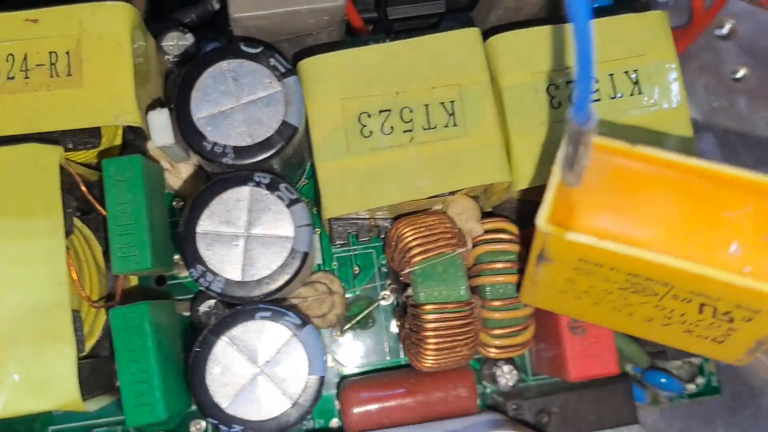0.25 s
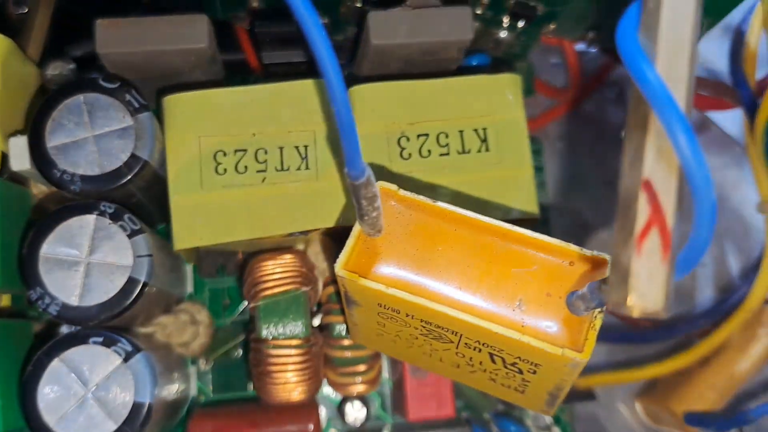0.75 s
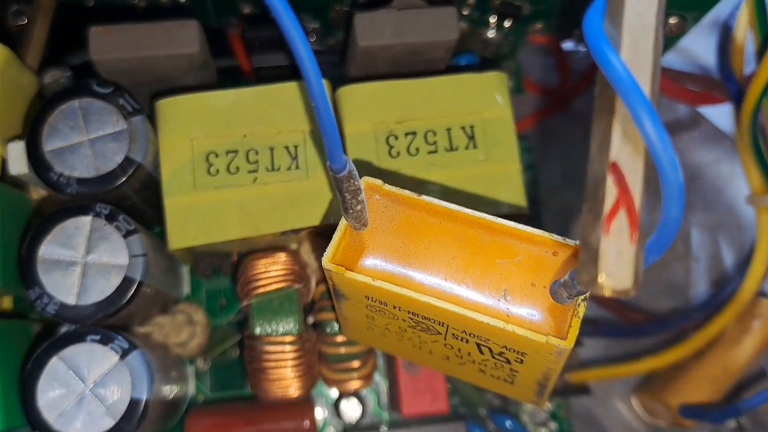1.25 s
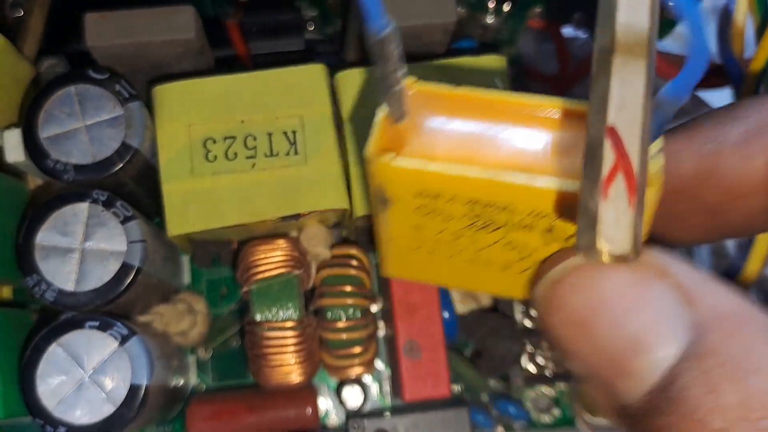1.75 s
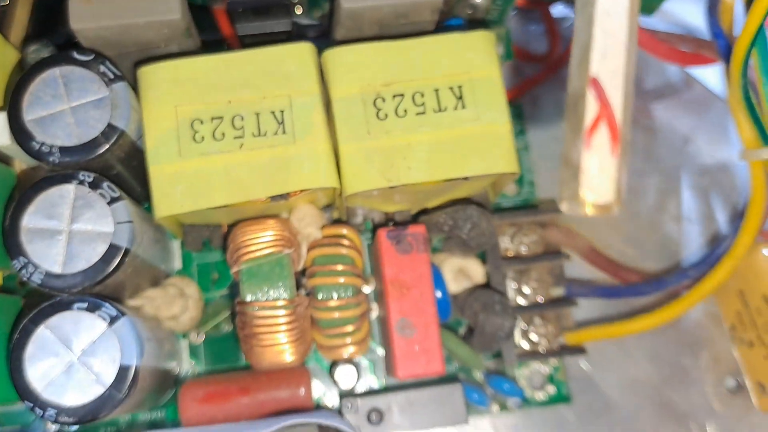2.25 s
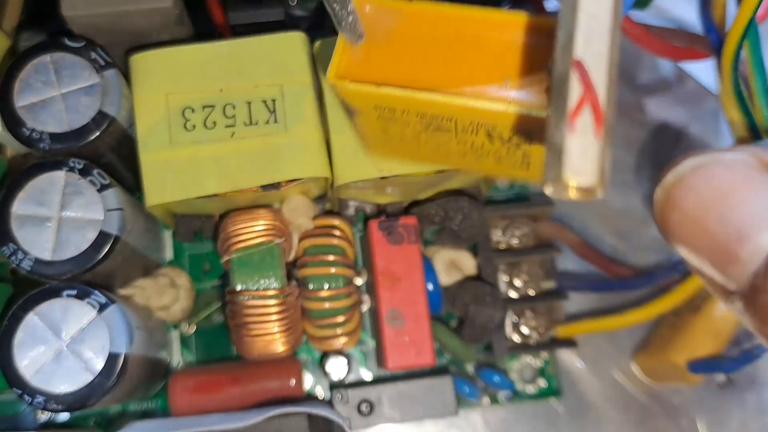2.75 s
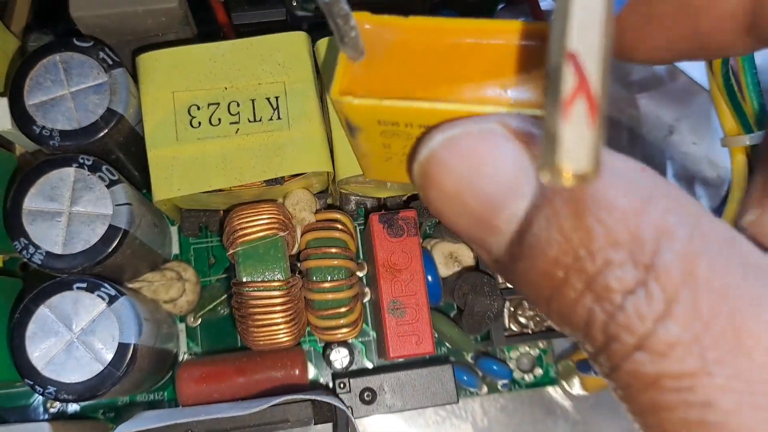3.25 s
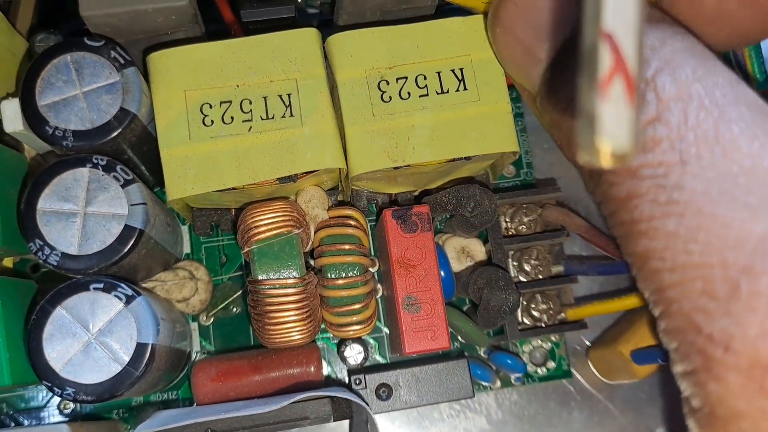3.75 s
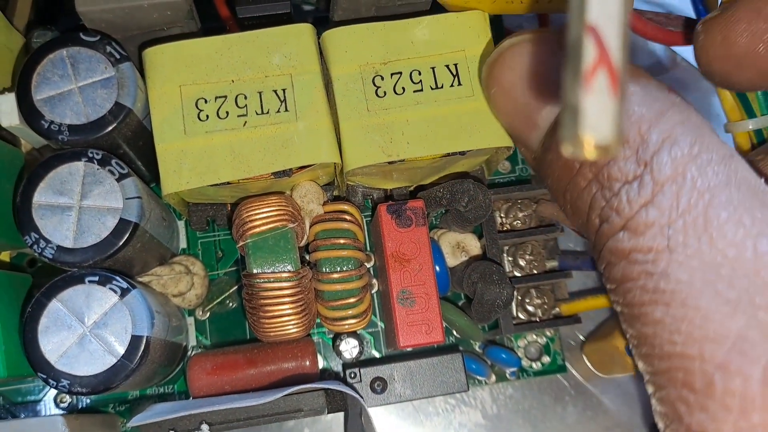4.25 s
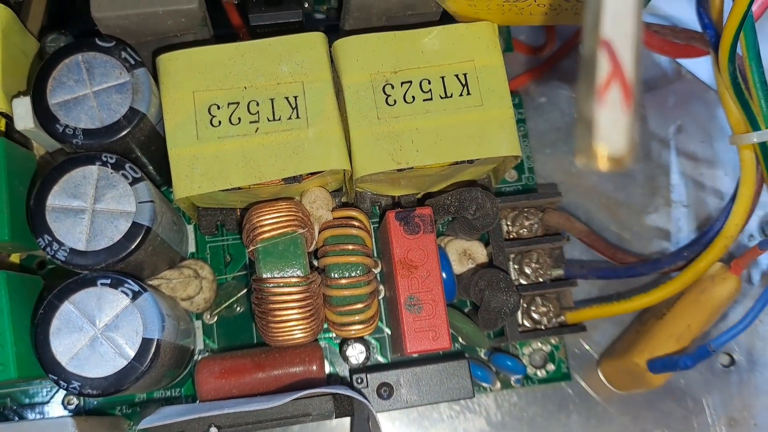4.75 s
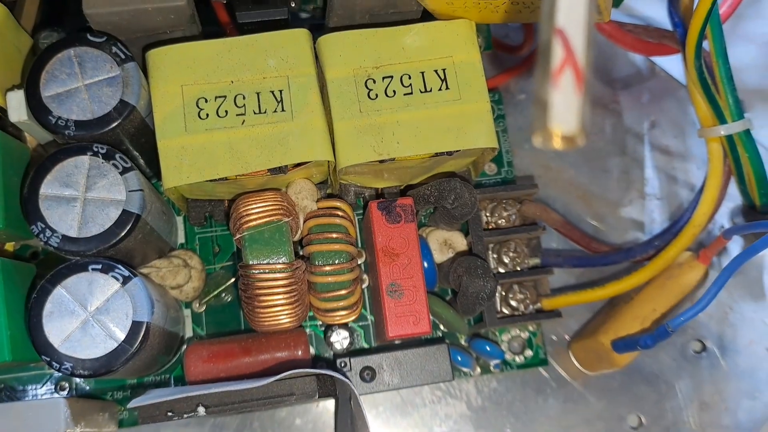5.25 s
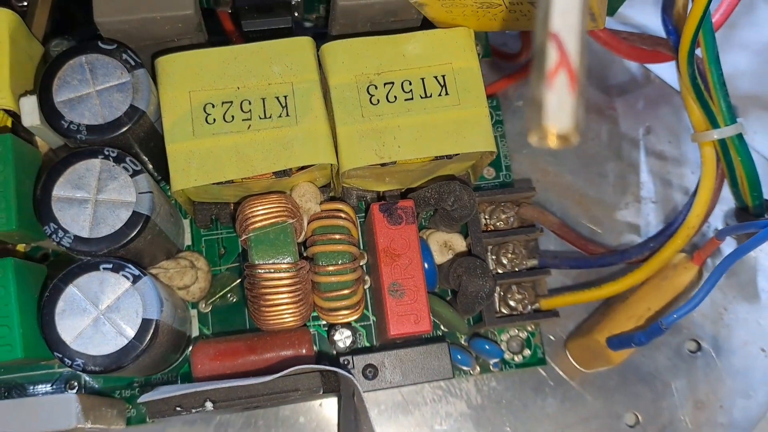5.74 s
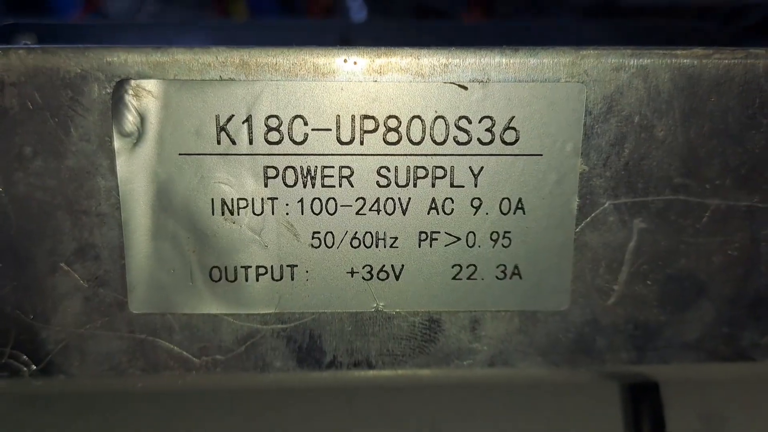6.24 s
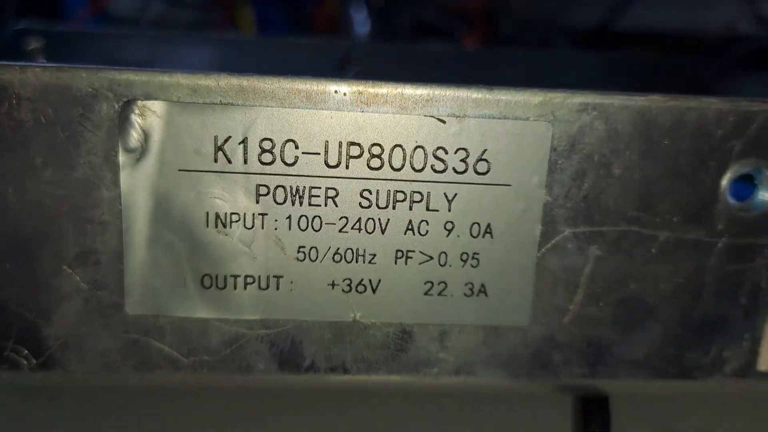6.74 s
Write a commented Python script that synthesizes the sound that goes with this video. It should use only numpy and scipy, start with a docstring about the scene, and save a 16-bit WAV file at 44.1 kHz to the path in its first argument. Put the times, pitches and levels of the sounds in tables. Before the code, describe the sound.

Hard plastic part knocks, scrapes and squeaks briefly against a thin metal case in a quiet room, with finger ticks close to the microphone.

```python
"""A hand lifts, drags and taps a small plastic part against the open metal case of a power supply.
Taps ring the metal's modes, with noise for rattle and crack; filtered noise scrapes and slides, tones squeak.
Fingers tick and rub on the body of a hand-held camera close by: noise bursts, low pushes and short strokes.
Behind them the bench rumbles, bumps and hums, and the quiet room and microphone hiss: noise and a low tone."""
import sys
import numpy as np
from scipy import signal
from scipy.fft import rfft, irfft, next_fast_len
from scipy.io import wavfile
from scipy.ndimage import uniform_filter1d, map_coordinates

SR = 44100
rng = np.random.default_rng(int(sys.argv[2]) if len(sys.argv) > 2 else 0)


def amplitude_ratio(level_db):
    """Convert a level in decibels to the matching linear amplitude (field) ratio."""
    exponent = np.asarray(level_db, float) / 20
    return 10 ** exponent


def bounce(signal):
    """Save signal as a 16-bit WAV file at the path given by the first command-line argument."""
    frames = np.transpose(np.atleast_2d(signal))
    limited = np.clip(frames, -1, 1)
    pcm = np.round(limited * 32767).astype(np.int16)
    wavfile.write(sys.argv[1], SR, pcm)


N = 308391  # length in samples

# taps on the case; the crack is relative to the ring's peak:
# start_s, ring_peak_db, low_mode_hz, high_mode_hz, crack_db
TAPS = [(1.11, -34.5, 785, 4080, -4.5), (1.136, -32.5, 748, 2200, -8.5), (1.227, -21, 686, 2120, -17),
        (1.321, -53, 1540, 2450, -3.5), (1.34, -56.5, 603, 2470, 7), (1.42, -30, 1620, 1880, -20.5),
        (1.578, -30, 1030, 1910, -34), (1.722, -35.5, 1320, 1930, -42), (1.745, -33, 1350, 2780, -45),
        (1.758, -32.5, 1065, 1840, -42), (1.915, -52.5, 1010, 4010, -20.5), (1.938, -32, 1920, 4240, -20),
        (2.026, -27.5, 1060, 3000, -35), (2.036, -12, 1870, 4040, -49), (2.164, -41.5, 996, 1940, -26),
        (2.242, -47, 1060, 1910, -28), (2.388, -37.5, 785, 1210, -23), (2.393, -36.5, 1000, 4500, -1),
        (2.409, -42, 785, 1945, -28), (2.429, -41.5, 1000, 5630, -2.5), (2.447, -36, 786, 1195, -27),
        (2.476, -31.5, 783, 1220, -25), (2.528, -83.5, 1200, 4890, 2.5), (2.776, -31.5, 2100, 3970, -14),
        (3.054, -54, 789, 5560, -10), (3.147, -38, 781, 2110, -43), (3.158, -27, 1200, 1934, -67),
        (3.295, -25.5, 1310, 2482, -25.5), (3.326, -38, 1430, 2460, -28), (3.35, -26.5, 993, 1940, -28),
        (3.398, -31, 1200, 1934, -55), (3.41, -38.5, 1330, 1970, -31), (3.461, -42, 1200, 1485, -30.5),
        (3.512, -36, 875, 2130, -9), (3.526, -22.5, 1430, 1536, -19.5), (3.54, -24, 900, 2950, -7.5),
        (3.553, -27, 1420, 1520, -10), (3.575, -24.5, 1320, 3010, -21.5), (3.603, -27.5, 3040, 5580, -3.5),
        (3.647, -12.5, 1530, 1940, -11), (3.655, -24, 1065, 1940, -40), (3.755, -33.5, 1060, 1200, -29),
        (3.847, -21.5, 781, 1210, -66), (3.856, -34.5, 781, 2060, -49), (3.875, -41, 781, 1330, -46),
        (4.063, -25.5, 1060, 1910, -19), (4.157, -42.5, 1000, 1200, -20), (4.222, -24, 1440, 1520, -25),
        (4.232, -37.5, 1065, 1450, -43), (4.344, -17, 885, 2060, -47.5), (4.358, -24, 640, 2190, -40),
        (4.367, -28.5, 885, 2210, -45.5), (4.521, -51.5, 665, 3840, -4.5), (4.562, -44.5, 834, 3870, 3),
        (4.638, -45, 993, 1900, -25.5), (5.106, -52.5, 1150, 1870, -26.5)]
# ways the metal case rings; t60 is the time to fade 60 dB: pitch_hz, level_db, t60_s, left_lead_rad
CASE_MODES = [(545, -8, .1, -.4), (640, -2, .13, -.7), (785, -4, .12, -.5), (885, -5, .14, .3),
              (995, -4, .12, 1.1), (1065, -2, .11, 1.3), (1195, -3, .11, 1.6), (1330, -6, .1, 2.1),
              (1450, -1, .09, 2.2), (1520, -3, .07, 2.3), (1700, -9, .07, 2.2), (1870, -2, .1, 1.9),
              (1945, -1, .11, 1.7), (2060, -5, .1, 1.4), (2210, -4, .09, 1.1), (2330, -3, .06, .8),
              (2460, -5, .07, .7), (2820, -8, .07, 1.4), (3020, -6, .07, 1.9), (3110, -4, .06, 2.1),
              (3290, -6, .045, 2.5), (3970, -4, .075, .3), (4240, -6, .06, .2), (4760, -10, .045, 1.5),
              (5290, -10, .04, 2.5), (5580, -6, .045, -.4), (6040, -7, .04, .6), (6770, -10, .025, 1.4),
              (7500, -14, .03, 1.3)]
# low modes sound from the right, higher ones from the left: low_mode_hz, left_over_right_db
PANELS = [(650, -6), (850, -5.5), (1000, 6), (1450, 7), (1900, 3.5)]
HIGH_MODE_DB = -2  # the high mode's share of a blow
BLOW_DB, BLOW_S = -4, .003  # extra ring while part and metal touch, and how fast it dies away
HAND_DAMPING = .85  # share of the ring time left while something drags on the metal

# edges squeaking as they stick and slip: start_s, end_s, level_db, start_pitch_hz, end_pitch_hz
SQUEAKS = [(0.958, 1.096, -61, 5720, 4840), (1.004, 1.106, -59, 2430, 2203),
           (1.041, 1.151, -51, 4190, 4080), (2.09, 2.111, -39.5, 963, 990), (2.169, 2.187, -37, 992, 1100),
           (2.183, 2.2, -44, 1060, 1110), (2.204, 2.241, -57, 1050, 1080), (2.277, 2.3, -51, 940, 996),
           (2.291, 2.317, -41.5, 989, 1048), (2.314, 2.33, -46, 1060, 1070),
           (2.333, 2.366, -62, 1060, 1055), (3.213, 3.245, -58, 4000, 3700),
           (3.249, 3.286, -46.5, 3106, 3110), (3.621, 3.648, -35, 3250, 3270),
           (3.622, 3.648, -39.5, 1500, 1453)]
# the part dragged along the case: start_s, end_s, level_db, start_centre_hz, end_centre_hz
DRAGS = [(0.967, 1.09, -54, 5150, 3580), (1.0, 1.096, -52.5, 895, 875), (1.109, 1.134, -44, 2320, 2330),
         (2.143, 2.178, -48, 4000, 4000), (2.383, 2.43, -54, 3040, 3080), (2.464, 2.497, -51, 4220, 4550),
         (2.507, 2.542, -51.5, 5330, 5500), (2.734, 2.755, -42.5, 5300, 5300),
         (3.205, 3.284, -52.5, 2780, 2930), (3.609, 3.656, -32.5, 3440, 2550),
         (4.047, 4.06, -42, 3040, 2980), (4.115, 4.222, -60, 2500, 4200), (5.004, 5.118, -71, 3520, 2590)]
# air in a drag before its firmness counts: start_centre_hz, air_db
DRAG_AIR = [(900, -29), (2500, -13.5), (5400, -7.5)]
FIRM_DB, AIR_LOSS = -52.5, 0.52  # air loses this share of each dB above firm, and gains it below
DRAG_PAN_DB = 2.5  # left over right

# loose contact of hand, part and wires with the case: time_s, level_db, brightness_db
CONTACT = [(0.0, -73.5, -8), (0.35, -69.5, -13), (0.75, -75.5, -13), (0.93, -87, -4), (1.02, -65, 15),
           (1.14, -50.5, 6), (1.3, -55, -1.5), (1.4, -68, -2), (1.45, -59.5, 3.5), (1.65, -59.5, 4),
           (1.72, -64, -2), (1.87, -76, -22), (1.96, -56.5, 2.5), (2.1, -57, 3.5), (2.35, -61.5, 0),
           (2.5, -73, -11), (2.58, -73.5, -6), (2.8, -64, 12), (3.12, -75, -8.5), (3.2, -56, 3),
           (3.45, -58.5, 1.5), (3.68, -48.5, 0), (3.82, -62.5, -2), (3.92, -50.5, -11.5),
           (4.03, -61.5, -11), (4.45, -50, -12), (4.63, -68, 6.5), (4.8, -85, -3), (5.39, -80.5, 3.5),
           (5.43, -53, -1), (5.55, -58, -4.5), (5.64, -70.5, -25), (5.8, -86.5, -5), (6.2, -91, -9),
           (6.27, -69, -10), (6.42, -94, -5), (6.99, -79.5, 2)]
LOW_DB, HIGH_DB, SKIN_DB, AIR_DB = -4, -11.5, -13, -24  # each layer relative to the contact level
FLUTTER_DB, FLUTTER_RATE = 4, 9.9  # unsteady pressure: typical swing, knots per second
# the part slithers on after a tap: level relative to it, time to fade 20 dB, share of hiss
SETTLE_DB, SETTLE_S, SETTLE_SKIN_DB = -30.5, 0.037, -9.5
SLIP_DB, SLIP_RATE = 6.5, 50  # gritty slips: typical swing, knots per second

# skin and wire sleeves sliding; air is relative to skin; rows with fade 0 or less are silent:
# peak_s, fade_20db_s, level_db, air_db, left_over_right_db
SLIDES = [(0.168, 0.0058, -55.5, -29, -45), (.33, .3, -78, -8, 0), (0.758, 0.1, -68, -2, -52),
          (1.05, 0, -50, -3, -5), (1.088, 0.1048, -72, 11, -15), (1.15, .07, -91, -9, -5),
          (1.26, 0.36, -77, 2, -13), (1.94, 0.07, -57, -17.5, 14), (2.4, 0.08, -63.5, -9.5, 3),
          (2.7, -0.46, -68, 0, -0.5), (2.78, 0.0628, -53, 2, -18), (2.829, 0.57, -63.5, -7.5, 1.5),
          (3.251, 0.13, -65.5, -11.5, 1), (3.68, -0.03, -69, -2, 8.5), (4.052, 0.16, -66.5, -5, 20),
          (4.209, 0, -60.5, -5.5, 21.5), (4.61, 0.14, -68.5, -5, -0.5), (4.839, 0.4, -84.5, 9, -57.5),
          (5.04, 0.12, -66.5, -12.5, 5), (5.47, 0.39, -70.5, -24, 3), (5.74, 0.03, -77, 0, -7.5),
          (6.249, 0.12, -70, -1, 2), (6.63, 0.4, -78.5, -4.5, -56), (6.87, 0.27, -75, -8.5, 22)]
# finger strokes over the camera; body and bass are relative to the rub:
# start_s, end_s, level_db, body_db, bass_db
STROKES = [(0.143, 0.211, -70.5, 7, 11), (0.723, 0.796, -66, 3.5, 12), (4.805, 4.859, -54, -25, -28),
           (4.838, 4.914, -43.5, -14.5, -17.5), (5.697, 5.804, -63.5, 17.5, 35), (6.55, 6.599, -68, 5, 0),
           (6.592, 6.672, -54.5, -4, -0.5)]
FINGER_PAN_DB, GRIP_DB = -40, 13.5  # finger by the right port; bass above the second evens the sides
# ticks on the camera; treble and thump are relative to the snap:
# start_s, peak_db, treble_db, thump_db, left_over_right_db
TICKS = [(2.775, -23.5, 9.5, -38, -15), (4.84, -6, -1, -24.5, -62.5), (5.649, -45.5, -3, 4.5, -34),
         (6.185, -59.5, -14, 11.5, 19), (6.232, -25.5, -6.5, 1, 13.5), (6.251, -44.5, -10, 7, -27),
         (6.462, -71.5, -11, 4.5, -4.5), (6.474, -54.5, -21.5, 0, -12), (6.49, -52.5, -11, 6.5, -22),
         (6.538, -26, -4, -6, -53)]

# shaking of bench and hand, before each layer's own offset: time_s, level_db
RUMBLE = [(0.0, -56.5), (0.39, -55), (0.56, -64), (1.44, -63), (2.53, -61), (3.13, -66), (3.74, -54),
          (4.13, -61.5), (4.5, -63), (4.96, -72.5), (5.45, -65.5), (5.65, -57.5), (5.76, -72), (6.21, -63),
          (6.37, -61), (6.99, -70.5)]
# dull bumps through the bench; rows with fade 0 or less are silent: peak_s, fade_20db_s, level_db
BUMPS = [(.22, 0.37, -46.5), (.72, -0.2, -59), (1.02, -0.31, -43.5), (1.13, 0.31, -44),
         (1.24, 0.086, -41.5), (1.42, -0.2, -36.5), (1.63, 0.34, -57), (1.75, -0.2, -40), (1.95, 0.1, -50),
         (2.04, 0.29, -45), (2.45, 0.44, -52.5), (3.17, 0.74, -56), (3.31, 0.54, -57), (3.51, 0.3, -51.5),
         (3.76, 0, -49), (3.86, 0.47, -58), (4.19, 0.17, -58), (4.36, 0.09, -42), (4.85, 0.06, -53.5),
         (5.45, 0.07, -49.5), (5.725, 0.0259, -46.5), (5.755, 0.004, -40.5), (5.779, -0.0527, -34),
         (6.23, 0.7, -71.5), (6.48, -0.13, -67.5), (6.54, -0.15, -45), (6.62, 0.1, -68.5)]
# spells in which the hum stands out: start_s, end_s, level_db
HUMS = [(.16, .28, -47.5), (0.662, .74, -55), (0.98, 1.05, -58), (1.109, 1.2, -54), (2.43, 2.52, -54.5),
        (3.098, 3.2, -61), (3.6, 3.72, -59), (3.863, 3.98, -58), (6.26, 6.43, -52), (6.5, 6.67, -58.5),
        (6.68, 6.88, -54)]
HUM_HZ = 92.1  # average pitch
HUM_UNDER_DB = -9.5  # the hum's usual level relative to the rumble

# tone colours of noise, strengths relative within each: pitch_hz, level_db
GRIT = [(400, -33), (800, -4.5), (2000, -4), (4000, -9), (6000, -11), (9000, -35.5)]  # rough contact
SKIN = [(2000, -27), (3500, -5.5), (5500, -3), (7000, -4.5), (8500, -16.5), (11000, -46)]  # sliding hiss
AIR = [(6000, -32), (8500, -3), (10500, -6.5), (12500, 1), (14000, -7.5), (15700, -8), (16000, -42)]  # highest hiss
RUB = [(240, -31), (400, -10), (789, -24.5), (921, -26), (1010, -15), (3930, -10.5), (5270, -5.5),
       (6640, -3), (9320, -8), (12100, 1.5), (16000, -16.5)]  # finger on the camera
PUSH = [(18, -35.5), (30, -0.5), (86, 6), (140, -13), (250, -6.5), (473, -10.5), (636, -20), (724, -20),
        (2280, -38.5), (2500, -32), (3250, -46.5), (5500, -120)]  # finger pressure
SNAP = [(180, -52), (300, -7.5), (981, -18), (1570, -2.5), (3170, -11.5), (3720, -3), (4260, 2.5),
        (4810, -1.5), (7500, -4.5), (9750, -45), (16500, -120)]  # dry tick
BENCH = [(20, -38.5), (35, -4), (55, 3), (80, 2.5), (120, -12), (170, -58)]  # deep shaking
THUD = [(90, -24), (150, -3), (200, -7.5), (250, -1.5), (310, -5.5), (385, -6.5), (425, -3), (480, -12.5),
        (700, -11), (1300, -29), (2500, -52)]  # dull bumps
HUSH = [(59, -33), (100, 4), (410, -22), (446, -27), (615, -25), (1170, -38), (1540, -30), (2630, -32.5),
        (2920, -31.5), (5210, -40), (6580, -38), (7170, -45.5), (12000, -35), (15100, -39.5), (16500, -51)]  # quiet room and microphone hiss
# how alike left and right are in the hush, 1 being the same: pitch_hz, likeness
ALIKE = [(60, 1), (240, -0.4), (950, 0.75), (3770, -0.47), (15000, -0.1)]
# how long the room takes to fade 60 dB: pitch_hz, t60_s
ROOM = [(200, 0.12), (1000, 0.36), (4000, 0.5), (12000, 0.35)]
# the microphone's response: pitch_hz, gain_db
MIC = [(20, -22), (35, -5.5), (48, 1), (15600, 0.15), (16000, -16.5), (16900, -31)]


def taps():
    """Each blow favours a low and a high mode, wakes their neighbours, rattles and cracks."""
    track, t = np.zeros((2, N)), np.arange(SR // 5) / SR
    hz, db, t60, lead = np.transpose(CASE_MODES)[:, :, None]
    chance = rng.standard_normal((len(TAPS), 2, len(CASE_MODES), 1))
    # what the high mode leaves to the low one
    low_share = np.sqrt(max(1 - amplitude_ratio(2 * HIGH_MODE_DB), .02))
    for (s, peak_db, low_hz, high_hz, crack_db), (size, phase) in zip(TAPS, chance):
        # a crisp, glancing contact rings for a shorter time
        ring_share = np.clip(.3 - .022 * crack_db, .3, 1)

        def blow(f):
            low = low_share * amplitude_ratio(reach(f, low_hz, 0.32))
            return low + amplitude_ratio(HIGH_MODE_DB + reach(f, high_hz, 0.69))

        # modes close to the two struck pitches stand out
        struck_db = 6 * sum(np.exp(-(np.log2(hz / spot) / .04) ** 2) for spot in (low_hz, high_hz))
        scatter_db = 2.5 * size
        fade = blow(hz) * amplitude_ratio(db + struck_db + scatter_db - 60 * t / (t60 * ring_share))
        fade = fade * (1 - np.exp(-t / 0.00029))  # quick onset
        fade = fade * (1 + amplitude_ratio(BLOW_DB) * np.exp(-t / BLOW_S))
        angle = 2 * np.pi * hz * t + .45 * phase
        left = (fade * np.sin(angle + lead / 2)).sum(0)
        right = (fade * np.sin(angle - lead / 2)).sum(0)
        ring = np.array([left, right])

        noise = rng.standard_normal((2, 2, len(t)))
        # loose contact is broader than the ring
        rattle = unit(filtered(coloured(noise[0], GRIT), lambda f: blow(f) ** 0.43))
        rattle = rattle * (0.4 * amplitude_ratio(-60 * t / 0.02) + 0.08 * amplitude_ratio(-60 * t / (0.06 * ring_share)))
        hiss = unit(coloured(noise[1], AIR)) + amplitude_ratio(1.5) * unit(coloured(noise[1, ::-1], SKIN))
        crack = amplitude_ratio(crack_db) * hiss * amplitude_ratio(-60 * t / 0.018)
        sound = ring / np.abs(ring.mean(0)).max() + rattle + crack
        add(track, s, amplitude_ratio(peak_db) * sides(along(PANELS, low_hz))[:, None] * sound)
    return track


def reach(hz, centre_hz, spread):
    """How strongly a contact centred on centre_hz excites each frequency, in dB."""
    return -6 * np.abs(np.log2((hz + 1) / centre_hz) / max(spread, .1)) ** 1.7


def squeaks():
    """A gliding tone that stutters as the edge catches and lets go."""
    t = np.arange(N) / SR
    stutter, waver = amplitude_ratio(5 * wobble(110)), 1 + .02 * wobble(260)
    track = np.zeros((2, N))
    for start, end, db, from_hz, to_hz in SQUEAKS:
        pitch_hz = np.interp(t, [start, end], [from_hz, to_hz]) * waver
        angle = 2 * np.pi * np.cumsum(pitch_hz) / SR
        main_tone = np.sin(angle + np.array([[.6], [-.6]]))
        tone = np.sqrt(2) * (main_tone + amplitude_ratio(-13) * np.sin(1.4 * angle))
        track += gate(start, end, 0.0058, .01) * amplitude_ratio(db) * sides(5)[:, None] * stutter * tone
    return track


def contact():
    """Unsteady loose contact, its brightness, and the slithering after each tap."""
    level_db, bright_db = curves(CONTACT)
    loose = amplitude_ratio(level_db + FLUTTER_DB * wobble(FLUTTER_RATE))
    settle = sum(swell(s + 0.018, SETTLE_S, db + SETTLE_DB, rise=0.05) for s, db, *_ in TAPS)
    slips = amplitude_ratio(SLIP_DB * wobble(SLIP_RATE))
    return loose, amplitude_ratio(bright_db), slips * settle


def case(centre_hz, spread):
    """Steady rough contact ringing in the modes; each reaches the two ports with its own phase."""
    slips = rng.standard_normal(N) * amplitude_ratio(2.5 * wobble(160))
    half_lead = np.array([[.5j], [-.5j]])
    width = np.log(1000) / np.pi / HAND_DAMPING  # bandwidth times t60

    def modes(f):
        total = 0
        for k, (hz, db, t60, lead) in enumerate(CASE_MODES):
            damping = 1j * f * width / t60
            strength = (-1) ** k * amplitude_ratio(db) * np.exp(half_lead * lead)
            total = total + strength * damping / (hz * hz - f * f + damping)
        return total

    z = signal.stft(filtered(slips, modes), nperseg=512)[2]
    # the contact wanders over the modes
    shifting = uniform_filter1d(rng.standard_normal(z.shape[1:]), 3, 0)
    shifting = uniform_filter1d(shifting, 9, 1)
    ring = signal.istft(z * amplitude_ratio(3.5 * unit(shifting)), nperseg=512)[1][:, :N]
    grit = .55 * rush(GRIT, [(1000, .15)], grain_db=2.5, grain_rate=110)
    rough = ring / np.std(ring.mean(0)) + grit
    both = filtered(rough, lambda hz: amplitude_ratio(reach(hz, centre_hz, spread)))
    return both / np.std(both.mean(0))


def scrape(loose, bright, settle):
    """Loose contact under everything, and drags that start and stop and shift their colour."""
    centres_hz = np.array([1200, 2500, 5200])
    tones = [case(hz, spread=0.8) for hz in centres_hz]
    high = bright * case(3300, spread=0.27)
    track = (loose + settle) * (amplitude_ratio(LOW_DB) * tones[0] + amplitude_ratio(HIGH_DB) * high)
    air = rush(AIR, [(9000, .1)], grain_db=1.5, grain_rate=450)
    for start, end, db, from_hz, to_hz in DRAGS:
        # blend the three tones by their distance in octaves from the moving centre
        centre = np.log2(np.interp(np.arange(N) / SR, [start, end], [from_hz, to_hz]))
        colour = sum(amplitude_ratio(-8 * (centre - np.log2(hz)) ** 2) * tone for hz, tone in zip(centres_hz, tones))
        air_db = along(DRAG_AIR, from_hz) - AIR_LOSS * (db - FIRM_DB)
        gain = gate(start, end, 0.029, 0.068 * (end - start)) * amplitude_ratio(db)
        track += gain * sides(DRAG_PAN_DB)[:, None] * (colour + amplitude_ratio(air_db) * air)
    return track


def slide(loose, bright, settle):
    """Sliding skin and sleeves hiss, with a brighter air on top."""
    skin = rush(SKIN, [(5000, 0.052)], grain_db=1.5, grain_rate=70)
    air = rush(AIR, [(9000, .1)], grain_db=2.5, grain_rate=570)
    level = loose * bright + amplitude_ratio(SETTLE_SKIN_DB) * settle
    track = level * (amplitude_ratio(SKIN_DB) * skin + amplitude_ratio(AIR_DB) * air)
    for peak, fade, db, air_db, pan_db in SLIDES:
        gain = swell(peak, fade, db, rise=.5)
        track += gain * sides(pan_db)[:, None] * (skin + amplitude_ratio(air_db) * air)
    return track


def ticks():
    """A fingertip lets go of the camera body: a dry noise burst, a faint tail and a low push."""
    track, t = np.zeros((2, N)), np.arange(SR // 25) / SR
    burst = .35 * np.exp(-((t - .0015) / .001) ** 2) + np.exp(-((t - .0018) / .0003) ** 2)
    burst = burst + 0.037 * amplitude_ratio(-60 * t / 0.065)
    push = np.sin(2 * np.pi * 150 * t) * np.exp(-t / 0.0022)
    push = push + 0.34 * np.sin(2 * np.pi * 470 * t) * np.exp(-t / 0.003)
    for s, peak_db, treble_db, thump_db, pan_db in TICKS:
        noise = rng.standard_normal((2, len(t)))
        treble = amplitude_ratio(treble_db) * unit(coloured(noise[1], AIR))
        snap = (.5 * unit(coloured(noise[0], SNAP)) + .5 * treble) * burst
        snap = snap / np.abs(snap).max()
        add(track, s - .001, amplitude_ratio(peak_db) * sides(pan_db)[:, None] * (snap + amplitude_ratio(thump_db) * push))
    return track


def strokes():
    """Skin dragged over the camera starts and stops abruptly; pressure adds body and a heavy bass."""
    rub = rush(RUB, [(1000, 0.19)], grain_db=-1.5, grain_rate=80)
    body = rush(GRIT, [(1000, 0.69)], grain_db=1.5, grain_rate=51)
    press = rush(PUSH, [(100, .9)], grain_db=1.5, grain_rate=39)
    track = np.zeros((2, N))
    for start, end, db, body_db, bass_db in STROKES:
        # the more bass, the more the grip reaches both ports
        pan_db = FINGER_PAN_DB / (1 + amplitude_ratio(bass_db - GRIP_DB))
        skin = sides(pan_db)[:, None] * (rub + amplitude_ratio(body_db) * body)
        track += gate(start, end, 0.024, 0.015) * amplitude_ratio(db) * (skin + amplitude_ratio(bass_db) * press)
    return track


def rumble():
    """Bench and hand shake the camera; a low hum swells and fades within it, and bumps thud."""
    [rumble_db] = curves(RUMBLE)
    low = amplitude_ratio(rumble_db + 3.5) * rush(BENCH, [(50, .9)], grain_db=2.5, grain_rate=27)
    swells = amplitude_ratio(rumble_db + HUM_UNDER_DB)
    swells = swells + sum(amplitude_ratio(db) * gate(start, end, 0.01, 0.032) for start, end, db in HUMS)
    hum_angle = 2 * np.pi * np.cumsum(HUM_HZ + 3 * wobble(15)) / SR
    hum = np.sqrt(2) * swells * amplitude_ratio(2.2 * wobble(12)) * np.sin(hum_angle)
    bumps = amplitude_ratio(rumble_db - 14) + sum(swell(*row, rise=0.22) for row in BUMPS)
    thuds = bumps * rush(THUD, [(150, 1.0), (600, 0.15)], grain_db=1.5, grain_rate=19)
    return low + hum + thuds


def room(x):
    """Each frequency of the room's answer dies at its own speed."""
    hz, t, z = signal.stft(rng.standard_normal((2, SR // 2)), SR, nperseg=256)
    fading = z * amplitude_ratio(-60 * t / along(ROOM, hz)[:, None])
    tail = signal.istft(fading, SR, nperseg=256)[1]
    late = np.pad(x, ((0, 0), (300, 0)))  # the answer starts 300 samples late
    return signal.fftconvolve(late, tail / np.linalg.norm(tail[0]), axes=1)[:, :N]


def hush():
    """The steady air of the room and the microphone's own hiss."""
    return amplitude_ratio(-68) * rush(HUSH, ALIKE, grain_db=-0.6, grain_rate=22)


def unit(x):
    """Scaled to rms 1."""
    return x / np.sqrt(np.mean(x ** 2) + 1e-20)


def along(points, hz):
    """(Hz, value) points read on a log axis."""
    f, v = np.transpose(points)
    return np.interp(np.log(hz + 1), np.log(f + 1), v)


def curves(rows):
    """One value per sample for each column after the time."""
    s, *cols = np.transpose(rows)
    return [np.interp(np.arange(N) / SR, s, c) for c in cols]


def wobble(rate):
    """A smooth random curve, rate knots a second."""
    knots = rng.standard_normal(int(N * rate / SR) + 4)
    return map_coordinates(knots, [np.arange(N) * rate / SR])


def filtered(x, response):
    """x times a response of frequency."""
    n = x.shape[-1]
    m = next_fast_len(n + 4096)
    return irfft(rfft(x, m) * response(np.fft.rfftfreq(m, 1 / SR)), m)[..., :n]


def coloured(x, spectrum):
    """x through a (Hz, dB) spectrum."""
    return filtered(x, lambda hz: amplitude_ratio(along(spectrum, hz)))


def sides(pan_db):
    """Left and right gains whose mean is 1."""
    left = amplitude_ratio(pan_db) / (1 + amplitude_ratio(pan_db))
    return 2 * np.array([left, 1 - left])


def rush(spectrum, alike, grain_db, grain_rate):
    """Stereo noise, made grainy by fast random gain; the mean of both sides has rms 1."""
    pair = rng.standard_normal((2, N)) * amplitude_ratio(grain_db * wobble(grain_rate))

    def mid_and_side(hz):
        # likeness sets how the noise divides between the middle and the sides
        turn = np.arccos(np.clip(along(alike, hz), -1, 1)) / 2
        return amplitude_ratio(along(spectrum, hz)) * [np.cos(turn), np.sin(turn)]

    mid, side = filtered(pair, mid_and_side)
    return np.array([mid + side, mid - side]) / np.std(mid)


def gate(start, end, rise, fall):
    """Opens at start and shuts at end, times in seconds."""
    t = np.arange(N) / SR
    return np.clip((t - start) / rise, 0, 1) * np.clip((end - t) / fall, 0, 1)


def swell(peak, fade, db, rise):
    """Climbs to db at peak, falls 20 dB in fade s; the climb takes the share rise of that."""
    gain, t = np.zeros(N), np.arange(N) / SR - peak
    # a fade of 0 or less leaves this stretch empty
    near = slice(max(int((peak - 2 * fade) * SR), 0), int((peak + 3 * fade) * SR))
    gain[near] = amplitude_ratio(db - 20 * np.maximum(t[near], -t[near] / rise) / fade)
    return gain


def add(track, s, sound):
    """Mixes a stereo sound in at s seconds."""
    at = round(s * SR)
    track[:, at:at + sound.shape[1]] += sound[:, :N - at]


def scene():
    """Everything that reaches the two ports."""
    blows, touch = taps() + squeaks(), contact()
    metal = blows + amplitude_ratio(-17.5) * room(blows) + scrape(*touch)
    hands = slide(*touch) + ticks() + strokes()
    return metal + hands + rumble() + hush()


def roll_off(x):
    """The treble ends steeply here."""
    return signal.sosfilt(signal.butter(12, 16810, fs=SR, output="sos"), x)


def record(dry):
    """The microphone limits the band and its input stage rounds off near full scale."""
    sound = coloured(dry, MIC)
    sound = sound / (1 + np.abs(sound / .93) ** 8) ** (1 / 8)
    return roll_off(sound)


dry = scene()
out = record(dry)
bounce(out)
```